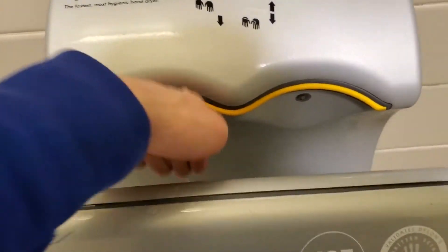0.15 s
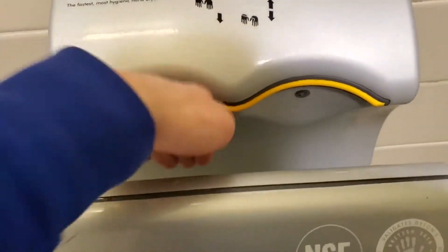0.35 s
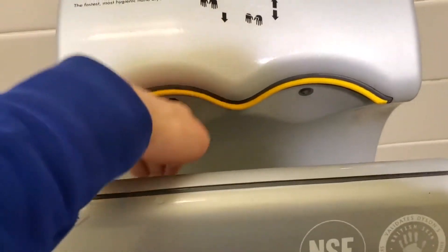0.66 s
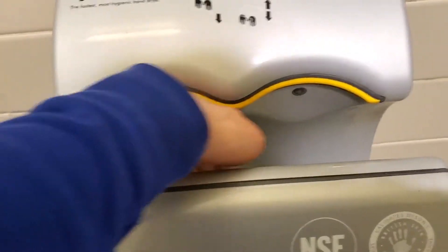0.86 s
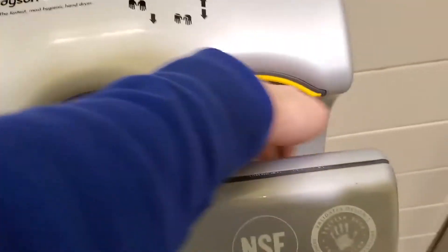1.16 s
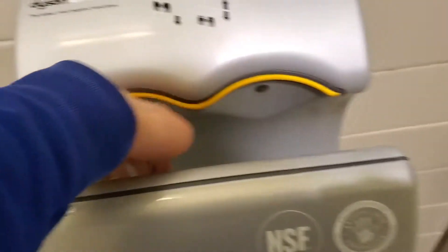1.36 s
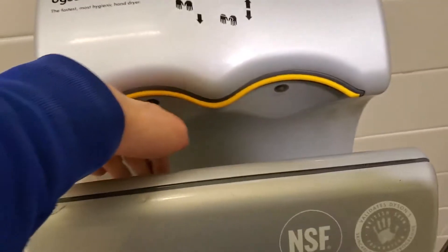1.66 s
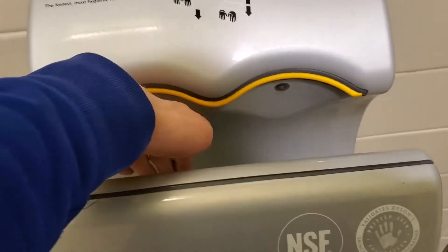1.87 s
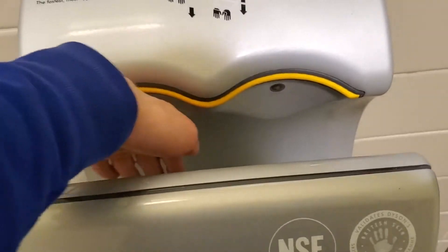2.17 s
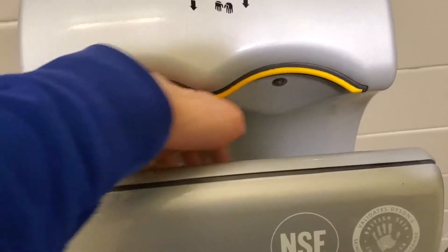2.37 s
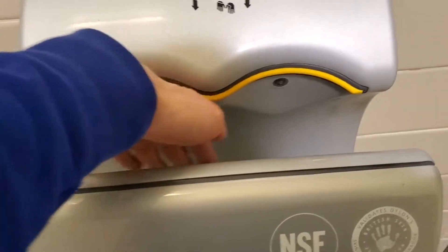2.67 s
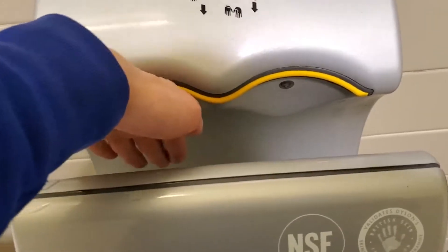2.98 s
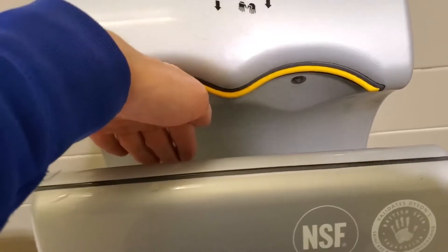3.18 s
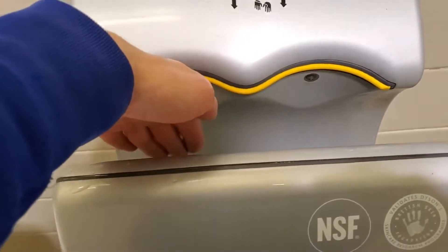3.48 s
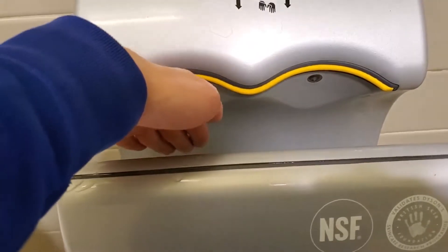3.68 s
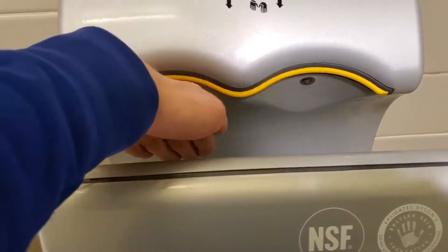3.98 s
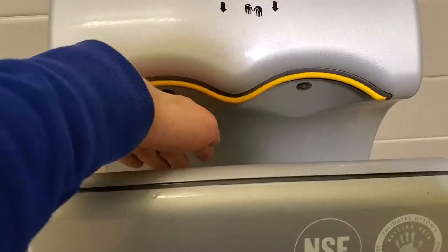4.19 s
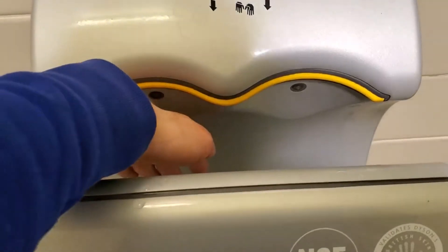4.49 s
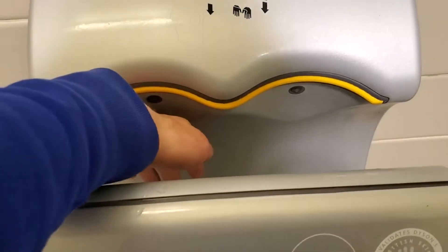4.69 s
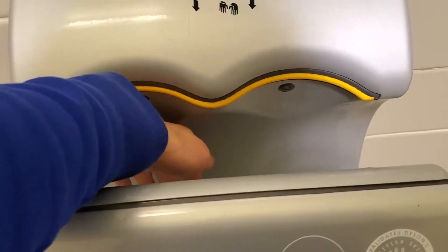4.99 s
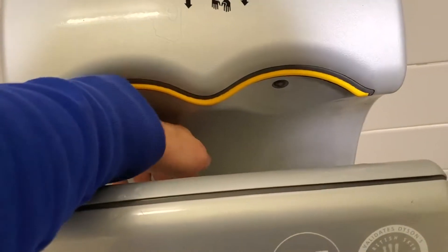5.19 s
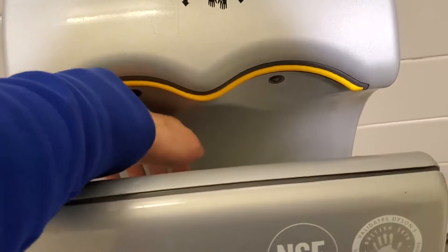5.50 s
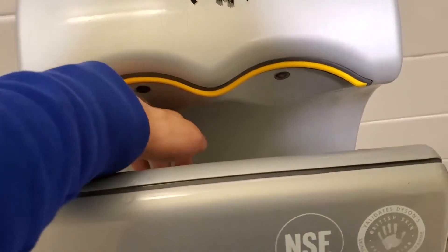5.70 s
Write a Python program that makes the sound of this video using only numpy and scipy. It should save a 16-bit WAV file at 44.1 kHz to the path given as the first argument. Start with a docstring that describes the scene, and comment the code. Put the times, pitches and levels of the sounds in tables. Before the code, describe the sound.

In a quiet tiled washroom, a hand dryer growls to life, its whine sweeping upward into a loud, steady roar of air over a hand.

```python
"""A tiled washroom: ventilation, a wavering mains hum, cloth rustles and dull taps, all shaped noise and tones.
A blade hand dryer switches on: shaken casing bands growl and shaft orders climb to a high nine-blade whine.
Two sheets of air roar over a hand: noise bands that follow powers of fan speed.
Low gusts and decaying thumps buffet the microphone ports close by."""
import sys
import numpy as np
from scipy import signal
from scipy.fft import rfft, irfft, next_fast_len
from scipy.io import wavfile
from scipy.ndimage import uniform_filter1d, map_coordinates

SR = 44100
rng = np.random.default_rng(int(sys.argv[2]) if len(sys.argv) > 2 else 0)


def inscribe(sig):
    """Save sig as 16-bit PCM at rate SR to the path in sys.argv[1].

    A 1-D sig is mono; a 2-D sig holds one channel per row.
    Samples are clipped to [-1, 1] before scaling.
    """
    pcm = np.round(np.clip(np.atleast_2d(sig).T, -1, 1) * 32767)
    wavfile.write(sys.argv[1], SR, pcm.astype(np.int16))


N = 257544
TIME = np.arange(N) / SR
ON_S = 2.275  # motor switches on
RIPPLE_HZ = 120  # twice the mains frequency

# turbulence spectra: (frequency [Hz], relative level [dB per Hz])
RUSH_SPECTRUM = [(600, -28), (850, -15.5), (1100, -6.5), (1400, -4), (1750, -3.5), (2100, -1), (3000, -7),
                 (3600, -15.5), (4500, -30)]
WHISTLE_SPECTRUM = [(1300, -46), (1480, -13), (1545, -1), (1620, -12), (1850, -55)]
HISS_SPECTRUM = [(2400, -62), (3100, -6), (4100, -1), (5000, -5), (6500, -6.5), (7300, -10), (9500, -56)]
FIZZ_SPECTRUM = [(6000, -60), (7400, -9.5), (9500, -5), (11000, -6), (12500, -1), (13500, -3), (15800, -4)]
ROAR_SPECTRUM = [(100, -13.5), (150, -5), (200, -4), (260, -3), (350, 1), (520, -2.5), (700, -8.5),
                 (900, -12), (1400, -72)]
# air bands: (level at full speed [dB], power of speed [1], overshoot [dB], change once the hand is deeper [dB])
RUSH_LAW = (-20, 1.75, 3, -3)
WHISTLE_LAW = (-29.5, 1.9, 3, -3)
HISS_LAW = (-26, 2.5, 6.5, 1.33)
FIZZ_LAW = (-24, 2.5, 4.5, 1.2)
# low roar at full speed: (time [s], level [dB])
ROAR_LEVEL = [(2.87, -25), (3.55, -22.5), (3.75, -25.5), (4.27, -27.5), (4.9, -21.5), (5.84, -24.5)]
# slot whistle flares: (time [s], lift [dB])
WHISTLE_FLARES = [(2.78, 4), (3.13, 4), (3.26, 5), (3.78, 3), (4.08, 6)]
# left-right likeness of close sound: (frequency [Hz], likeness [0-1])
NEAR_LIKENESS = [(80, 1), (340, 0.91), (520, 0.87), (700, 0.37), (1030, 0.33), (1500, 0.47), (2070, 0.12),
                 (2800, 0.028), (6000, 0.02)]
ROAR_POWER = 1.8  # of speed
FLARE_WIDE_S = .04
PUFF_S, PUFF_DB, PUFF_WIDE_S = 2.42, 7, 0.032  # first puff of air clears the slots
GUST_S, GUST_DB, GUST_WIDE_S = 4.49, 5, .025  # the hand throws a broad gust at the microphone
TREBLE_LEADS_S = 0.19  # hiss and fizz answer the sinking hand before the lower bands
AIR_PAN_DB = -3  # left-right of rush and whistle


def jets():
    """Sheets of turbulent air: each noise band grows as a power of fan speed."""
    puff = PUFF_DB * bump(PUFF_S, PUFF_WIDE_S)
    flares = sum(db * bump(s, FLARE_WIDE_S) for s, db in WHISTLE_FLARES)
    flutter = wobble(8)

    rush_db = air_law(*RUSH_LAW) + puff + 0.12 * flares + 0.11 * flutter
    air = amp(rush_db) * noise(RUSH_SPECTRUM, NEAR_LIKENESS, patchy_db=1.5)
    whistle_db = air_law(*WHISTLE_LAW) + flares
    air += amp(whistle_db) * noise(WHISTLE_SPECTRUM, NEAR_LIKENESS, patchy_db=1.5)
    air *= sides(AIR_PAN_DB)

    hiss_db = air_law(*HISS_LAW, TREBLE_LEADS_S) + puff + 0.47 * flutter
    air += amp(hiss_db) * noise(HISS_SPECTRUM, NEAR_LIKENESS, patchy_db=1.34)

    # the top treble stays fainter at first, then steps up by 9 dB just before 2.405 s
    fizz_step_db = 9 * np.clip((TIME - 2.405) / .03, -1, 0)
    fizz_db = air_law(*FIZZ_LAW, TREBLE_LEADS_S) + fizz_step_db + 0.13 * flutter
    air += amp(fizz_db) * sides(0.96) * noise(FIZZ_SPECTRUM, NEAR_LIKENESS, patchy_db=1.46)

    roar_db = curves(ROAR_LEVEL)[0] + ROAR_POWER * speed_level_db() + GUST_DB * bump(GUST_S, GUST_WIDE_S)
    air += amp(roar_db) * sides(0.71) * noise(ROAR_SPECTRUM, NEAR_LIKENESS, patchy_db=1.5)
    return tiles(switch(.005) * air, t60=.3, wet_db=-9, channels=1)


# gust spectrum: (frequency [Hz], relative level [dB per Hz])
BUFFET_SPECTRUM = [(15, -30), (35, -30), (60, 0.5), (110, -1.5), (180, -11.5), (300, -64)]
# (level at full speed [dB], power of speed [1], overshoot [dB], change once the hand is deeper [dB])
BUFFET_LAW = (-36.5, 1, 0, 4)
# left-right likeness of the gusts: (frequency [Hz], likeness [0-1])
PORT_LIKENESS = [(40, .35), (150, .65)]
# single gusts on the ports: (time [s], strength [dB], frequency [Hz])
PORT_THUMPS = [(2.96, -11, 75), (3.073, -10, 75), (4.043, -7, 75), (4.427, -8, 105), (4.478, -1, 300),
               (4.501, 3, 80), (4.604, -1, 82), (4.652, -4, 240), (5.74, -10, 75)]
THUMP_DIES_DB_PER_CYCLE = -15
PORT_CUT_HZ = 38  # the ports pass little under this


def buffeting():
    """Gusts press on the ports as low noise and decaying sine thumps; a second-order high-pass thins them."""
    gusts_db = air_law(*BUFFET_LAW) + 4.9 * wobble(4.17) + 1.0 * wobble(14)
    gusts = amp(gusts_db) * noise(BUFFET_SPECTRUM, PORT_LIKENESS, patchy_db=1.0)
    for s, db, hz in PORT_THUMPS:
        cycles = np.clip(TIME - s, 0, 1) * hz
        envelope = amp(db + THUMP_DIES_DB_PER_CYCLE * cycles) * cycles
        gusts += envelope * np.sin(2 * np.pi * cycles)
    high_pass = lambda hz: (1j * hz / (PORT_CUT_HZ + 1j * hz)) ** 2
    return sides(2.8) * switch(.05) * filtered(gusts, high_pass)


OVERSHOOT_S, OVERSHOOT_DIES_S = 2.907, 0.14  # full until then; decay time constant


def air_law(db, power, over_db, sunk_db, lead_s=0):
    """Air level [dB] from fan speed, settling after an overshoot, changed by the sinking hand."""
    overshoot = np.exp(-np.clip(TIME - OVERSHOOT_S, 0, None) / OVERSHOOT_DIES_S)
    return db + power * speed_level_db() + over_db * overshoot + sunk_db * sunk(lead_s)


def speed_level_db():
    """Shaft speed against full speed, as a level."""
    return 20 * np.log10(speed() / FULL_SPEED_HZ)


# shaft ramps: (time [s], speed [turns/s])
SHAFT_RAMPS = [(2.275, 120), (2.52, 520), (2.79, 1125)]
FULL_SPEED_HZ, SETTLE_S, LOAD_SAG_HZ = 1435.3, .11, 2.2  # turns/s; time constant; turns/s lost to the sunk hand


def speed():
    """Two ramps, then an ever slower climb to full speed [turns/s]."""
    knee_s, knee = SHAFT_RAMPS[-1]
    climb = (FULL_SPEED_HZ - knee) * (1 - np.exp(-np.clip(TIME - knee_s, 0, None) / SETTLE_S))
    return curves(SHAFT_RAMPS)[0] + climb - LOAD_SAG_HZ * sunk()


SINK_S, SINK_TAKES_S = 4.15, 0.312


def sunk(lead_s=0):
    """0 while the hand is high, 1 once it is deep in the slot."""
    return np.clip((TIME + lead_s - SINK_S) / SINK_TAKES_S, 0, 1)


def motor():
    """Shaft orders smeared by the tiles, with the blade whine and the mains hum direct."""
    gliding = tiles(switch(.02) * shaft_orders(), t60=.4, wet_db=-5, channels=2)
    return gliding + switch(0.018) * (whine() + motor_hum())


# (speed [turns/s], shaft [dB], two-pole [dB], four-per-turn [dB], nine-blade [dB])
ORDER_LEVELS = [(160, -36, -40, -52, -70), (490, -30, -33, -42, -62), (760, -34, -39, -36, -55),
                (960, -33, -45, -52, -49), (1320, -33, -46, -65, -40), (1435, -37, -38, -65, -34.5)]


def order_levels():
    """Level [dB] of each shaft order at the present speed."""
    turns, *levels = np.transpose(ORDER_LEVELS)
    return [np.interp(speed(), turns, db) for db in levels]


TWO_POLE_SUNK_DB = -7  # change once the hand is deeper


def shaft_orders():
    """Lines at 1, 2 and 4 per turn; the shaft runs unevenly until near full speed."""
    one_db, two_db, four_db, _ = order_levels()
    shaft = speed()
    uneven = shaft + np.clip(1 - shaft / 1400, 0, 1) * 18 * wobble(70)
    orders = tone(uneven, one_db, drift=0.32, fade_db=5.5)
    orders += tone(2 * uneven, two_db + TWO_POLE_SUNK_DB * sunk(), drift=1.4, fade_db=6.5)
    return orders + tone(4 * uneven, four_db, drift=1.2, fade_db=4)


# blade whine swells and fades: (time [s], change [dB])
WHINE_SWELLS = [(3.05, -2), (3.2, 3.5), (3.33, -5), (3.448, 3), (3.68, -2), (4.05, 1), (4.55, -5),
                (4.85, 3), (5.15, 2.5), (5.4, -6), (5.7, 1)]
FLANK_DB, FLANK_HIDDEN_DB = -10.5, -12  # relative to the whine; further change of the hidden side line


def whine():
    """Nine blades per turn; supply ripple adds side lines: upper shows first, lower once the hand is deeper."""
    blade_hz = 9 * speed()
    blade_db = order_levels()[3] + curves([(ON_S, 0)] + WHINE_SWELLS)[0]
    upper_db = blade_db + FLANK_DB + FLANK_HIDDEN_DB * sunk()
    lower_db = blade_db + FLANK_DB + FLANK_HIDDEN_DB * (1 - sunk())
    lines = tone(blade_hz, blade_db, drift=.35, fade_db=2)
    lines += tone(blade_hz + RIPPLE_HZ, upper_db, drift=1.2, fade_db=2.5)
    return lines + tone(blade_hz - RIPPLE_HZ, lower_db, drift=1.2, fade_db=2.5)


HUM_DB, HUM_FULL_S, HUM_RISE_DB_PER_S = -27.5, 2.57, 124
HUM_EASES_S, HUM_EASE_DB, HUM_EASE_TIME_S = 2.8, 7, 0.63


def motor_hum():
    """Mains hum rises under the starting load and eases as the shaft reaches speed."""
    rise_db = -HUM_RISE_DB_PER_S * np.clip(HUM_FULL_S - TIME, 0, None)
    easing = 1 - np.exp(-np.clip(TIME - HUM_EASES_S, 0, None) / HUM_EASE_TIME_S)
    return tone(RIPPLE_HZ, HUM_DB + rise_db - HUM_EASE_DB * easing, drift=0.051, fade_db=-1.0)


# casing shaken by the starting motor: (time [s], level [dB])
GROWL_LEVEL = [(2.28, -26.5), (2.33, -23), (2.4, -21.5), (2.47, -18.5), (2.55, -23.5), (2.67, -21),
               (2.74, -35.5)]
# low and high casing bands, each: (frequency [Hz], relative level [dB per Hz])
CASING_BANDS = [
    [(120, -27), (200, -16), (350, 6), (480, 0), (1300, -10.5), (1700, -63)],
    [(300, -31), (480, -9), (660, 0), (800, -13.5), (1300, -18.5), (1700, -60)],
]
HIGH_FROM_HZ, HIGH_SPAN_HZ = 130, 440  # turns/s over which the shaking moves to the high band


def growl():
    """Rough torque kicks shake the casing's low band, then its high one, and fade out by 2.8 s."""
    level_db, = curves(GROWL_LEVEL)
    high = np.clip((speed() - HIGH_FROM_HZ) / HIGH_SPAN_HZ, 0, 1)
    low_band, high_band = (noise(band, FAR_LIKENESS, patchy_db=3.5) for band in CASING_BANDS)
    shaking = np.sqrt(1 - high) * low_band + np.sqrt(high) * high_band
    ending = np.clip((2.8 - TIME) / 0.06, 0, 1)
    return switch(0.01) * ending * amp(level_db + 1.3 * wobble(45)) * sides(1.6) * shaking


def switch(rise_s):
    """0 before the motor starts, rising to 1."""
    return np.clip((TIME - ON_S) / rise_s, 0, 1)


# (time [s], ventilation [dB], hum [dB])
ROOM_LEVELS = [(0, -48, -50.5), (1.6, -50.5, -50.5), (2.26, -47.5, -50.5)]
# ventilation: (frequency [Hz], relative level [dB per Hz])
VENT_SPECTRUM = [(20, -27), (60, -2), (123, -6.5), (147, -15), (190, -11.5), (264, -15.5), (350, -15),
                 (541, -26), (647, -27.5), (925, -39.5), (1400, -43.5), (1750, -42), (2300, -43),
                 (3300, -52.5), (8000, -63), (13000, -59)]
# faint ventilation tones: (frequency [Hz], level [dB])
VENT_DRONES = [(298, -70), (348, -63)]
# left-right likeness of far sound: (frequency [Hz], likeness [0-1])
FAR_LIKENESS = [(60, 0.96), (200, 1), (350, 1), (700, 0.24), (1000, .07)]
# far left-right balance: (frequency [Hz], left over right [dB])
FAR_TILT = [(100, -0.5), (690, 3), (1030, -3), (2070, -8.5), (2900, -2.6), (6000, 3)]


def washroom():
    """Ventilation noise and drones, rustles and taps share a left-right tilt; a mains hum wavers."""
    vent_db, hum_db = curves(ROOM_LEVELS)
    far = amp(vent_db) * noise(VENT_SPECTRUM, FAR_LIKENESS, patchy_db=0.5)
    far += rustles() + taps()
    far += sum(tone(hz, db, drift=1.5, fade_db=5.0) for hz, db in VENT_DRONES)
    far = filtered(far, lambda hz: sides(along(FAR_TILT, hz)))
    return far + tone(RIPPLE_HZ, hum_db, drift=0.069, fade_db=2.0)


# cloth rustles: (time [s], level [dB], t60 [s])
CLOTH_STROKES = [(.165, -70, .6), (.378, -78, .15), (.69, -79, .6), (1.1, -86, .4)]
# cloth: (frequency [Hz], relative level [dB per Hz])
RUSTLE_SPECTRUM = [(1800, -37), (3000, -10), (4500, -12), (5200, 0), (5800, -11), (6500, -5), (8300, -18),
                   (13000, -11)]


def rustles():
    """Cloth friction: treble noise in decaying strokes."""
    strokes = sum(amp(db - 60 * np.abs(TIME - s) / t60) * (TIME > s) for s, db, t60 in CLOTH_STROKES)
    return strokes * amp(1.5 * wobble(30)) * noise(RUSTLE_SPECTRUM, FAR_LIKENESS, patchy_db=-2.0)


# far dull taps: (time [s], level [dB], frequency [Hz], t60 [s])
FAR_TAPS = [(0.167, -55.5, 988, 0.5), (0.599, -71, 1130, 0.3), (1.12, -72, 1030, .3)]


def taps():
    """Dull taps ring on in the tiles as decaying narrow-band noise."""
    total = np.zeros((2, N))
    for s, db, hz, t60 in FAR_TAPS:
        after = np.clip(TIME - s, 0, 1)
        band = [(hz * .7, -50), (hz * 0.98, -6), (hz, 0), (hz * 1.06, -6), (hz * 1.65, -50)]
        envelope = amp(db - 60 * after / t60) * np.clip(after / .006, 0, 1)
        total += envelope * noise(band, FAR_LIKENESS, patchy_db=-5.0)
    return total


def tiles(x, t60, wet_db, channels):
    """Direct sound plus tiled-wall echo: gliding lines smear, steady noise takes on fine peaks."""
    t = np.arange(SR // 2) / SR
    tail = rng.standard_normal((channels, len(t))) * amp(-60 * t / t60)
    echo = signal.fftconvolve(x, tail / np.linalg.norm(tail[0]), axes=1)[:, :N]
    return (x + amp(wet_db) * echo) / np.sqrt(1 + amp(2 * wet_db))


# phase lead of the left port: (frequency [Hz], lead [rad])
LEFT_LEAD = [(300, 0.049), (1400, 0.21), (1600, 0.44), (2070, 2.46), (2800, 3.41)]


def noise(spectrum, alike, patchy_db):
    """Stereo noise of rms 1 with time-frequency patches of random gain."""
    z = signal.stft(rng.standard_normal((2, N)), nperseg=512)[2]
    field = uniform_filter1d(rng.standard_normal(z.shape[1:]), size=5, axis=0)
    field = uniform_filter1d(field, size=10, axis=1)
    pair = signal.istft(z * amp(patchy_db * unit(field)), nperseg=512)[1][:, :N]

    def mid_side(hz):
        turn = np.arccos(np.clip(along(alike, hz), 0, 1)) / 2  # likeness = cos(2 turn)
        return amp(along(spectrum, hz)) * [np.cos(turn), np.sin(turn)]

    mid, side = filtered(pair, mid_side)
    lead = lambda hz: np.exp(np.outer([.5j, -.5j], along(LEFT_LEAD, hz)))
    return unit(filtered(np.array([mid + side, mid - side]), lead))


def tone(hz, db, drift, fade_db):
    """A line whose level and phase drift apart at the two ports as the microphone moves among wall echoes."""
    turns = np.cumsum(hz + np.zeros(N)) / SR
    wander = np.array([wobble(3.2), wobble(2.95)])
    fading = np.array([wobble(6.8), wobble(5.87)])
    return np.sqrt(2) * amp(db + fade_db * fading) * np.sin(2 * np.pi * turns + drift * wander)


def filtered(x, response):
    """x times a complex response of frequency."""
    m = next_fast_len(N + SR // 4)
    return irfft(rfft(x, m) * response(np.fft.rfftfreq(m, 1 / SR)), m)[..., :N]


def wobble(rate_hz):
    """A smooth random curve, rate_hz knots a second."""
    return map_coordinates(rng.standard_normal(int(N * rate_hz / SR) + 4), [TIME * rate_hz])


def bump(s, wide_s):
    """A bell of height 1."""
    return np.exp(-.5 * ((TIME - s) / wide_s) ** 2)


def curves(rows):
    """One value per sample for each column after the time."""
    s, *cols = np.transpose(rows)
    return [np.interp(TIME, s, c) for c in cols]


def along(points, hz):
    """(frequency [Hz], value) points on a log axis."""
    f, v = np.transpose(points)
    return np.interp(np.log(hz + 1), np.log(f + 1), v)


def sides(db):
    """Left and right gains for a left-right level."""
    return amp(np.outer([.5, -.5], db))


def amp(db):
    """Gain of a level."""
    return 10 ** (np.asarray(db) / 20)


def unit(x):
    """Scaled to rms 1."""
    return x / np.sqrt(np.mean(x ** 2) + 1e-20)


# room modes: (frequency [Hz], width [Hz], lift [dB])
STANDING_WAVES = [(346.5, 11, 2), (395, 12, 2), (499, 10, 5.5), (650, 14, 2.5)]


def scene():
    """The dryer in its room; standing waves lift narrow bands of all but the motor tones."""
    def lift(f):
        modes = ((amp(db) - 1) * 1j * f * w / (c * c - f * f + 1j * f * w) for c, w, db in STANDING_WAVES)
        return 1 + sum(modes)

    return filtered(jets() + buffeting() + growl() + washroom(), lift) + motor()


TOP_HZ = 15850


def record(dry):
    """The microphone channel rolls off over 120 Hz to nothing at its band limit."""
    return filtered(dry, lambda hz: np.sin(np.pi / 2 * np.clip((TOP_HZ - hz) / 120, 0, 1)) ** 2)


dry = scene()
out = record(dry)
inscribe(out)
```